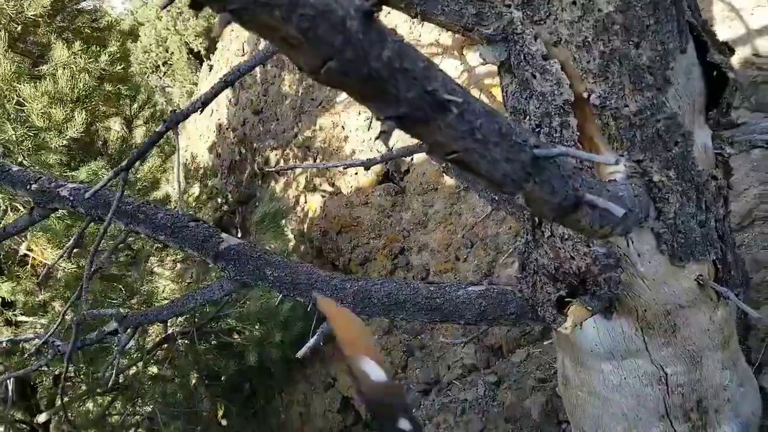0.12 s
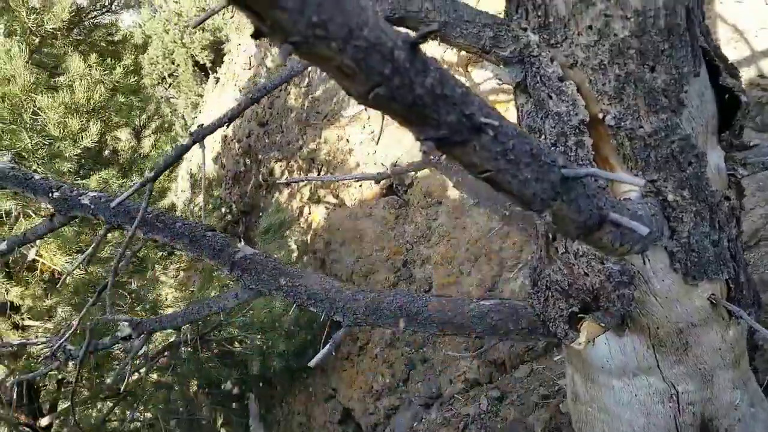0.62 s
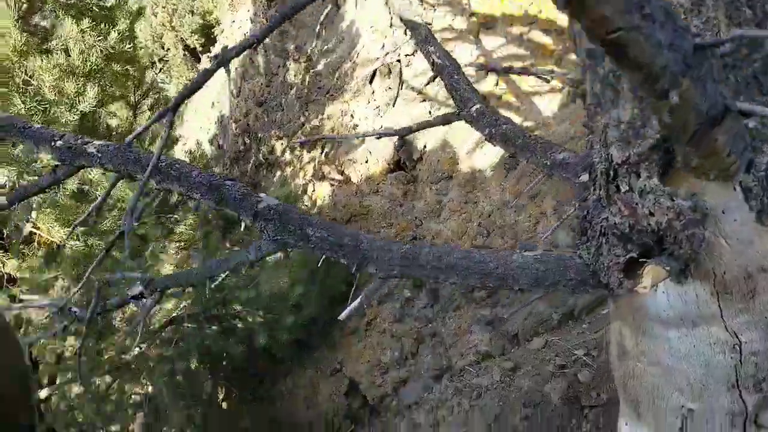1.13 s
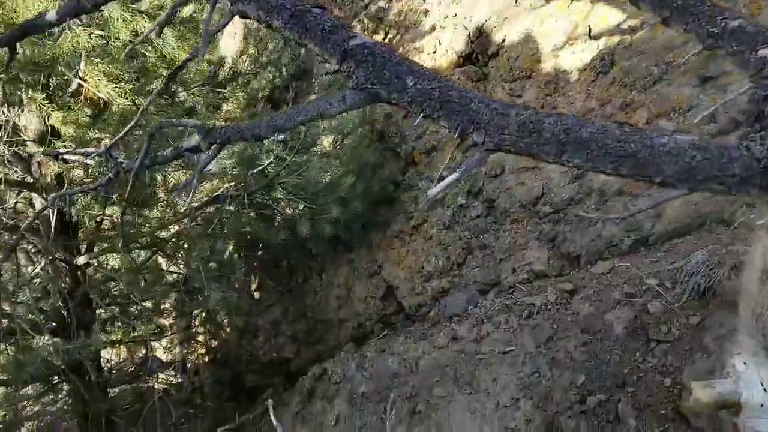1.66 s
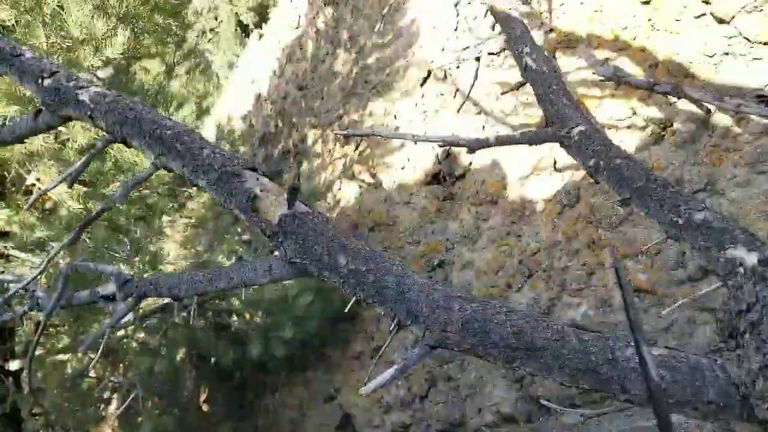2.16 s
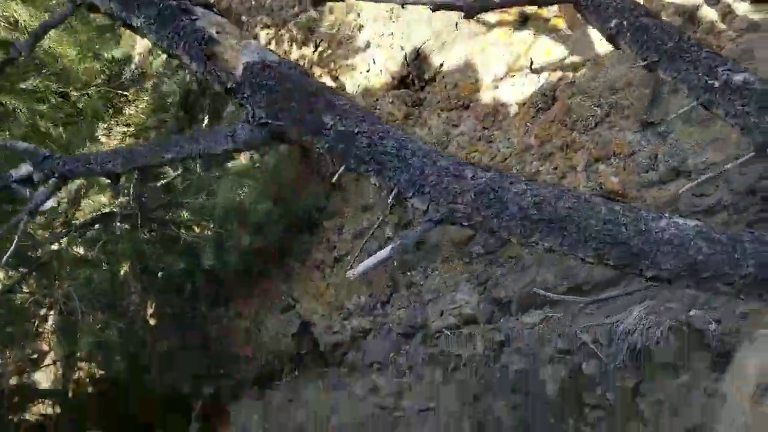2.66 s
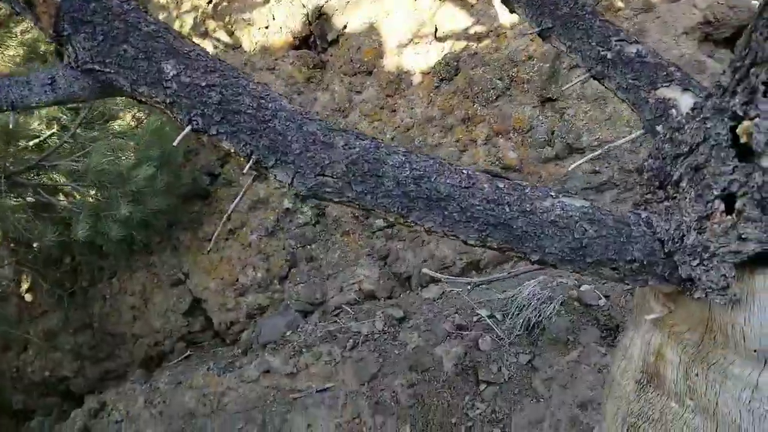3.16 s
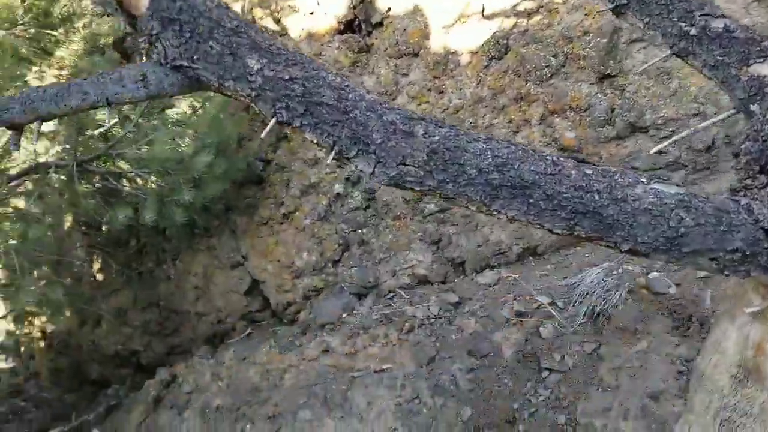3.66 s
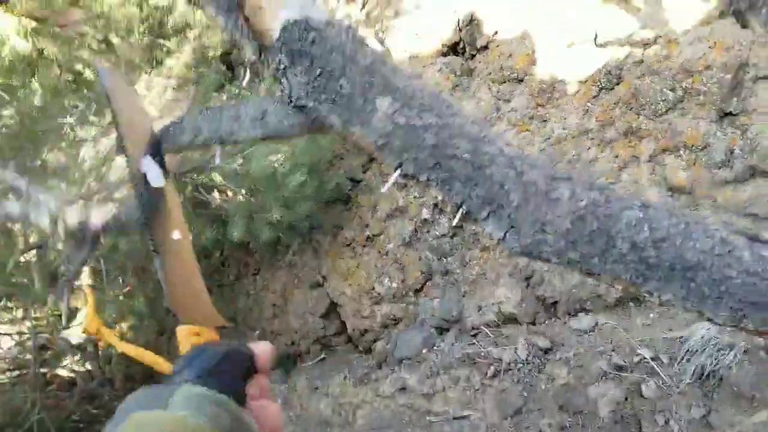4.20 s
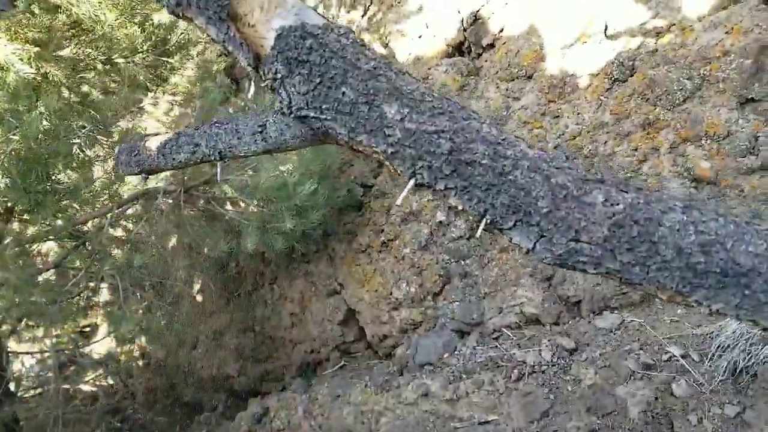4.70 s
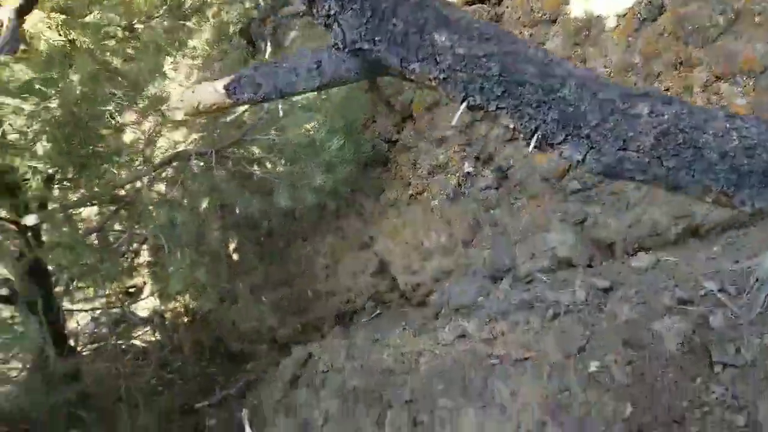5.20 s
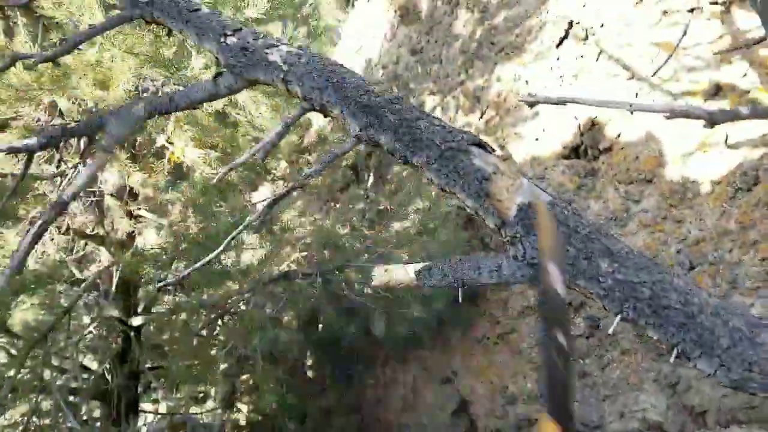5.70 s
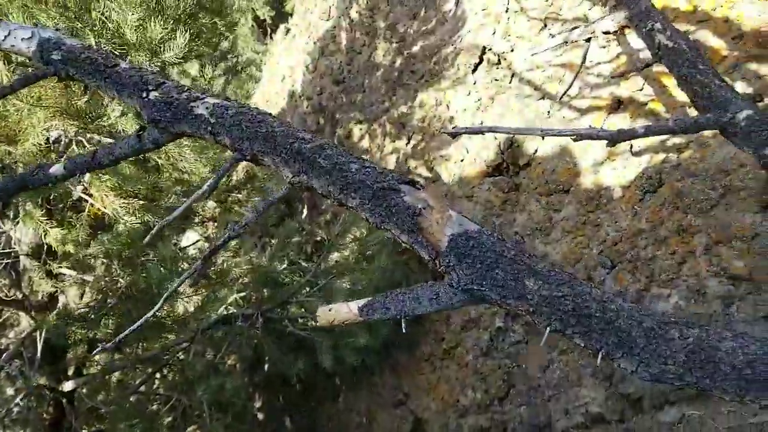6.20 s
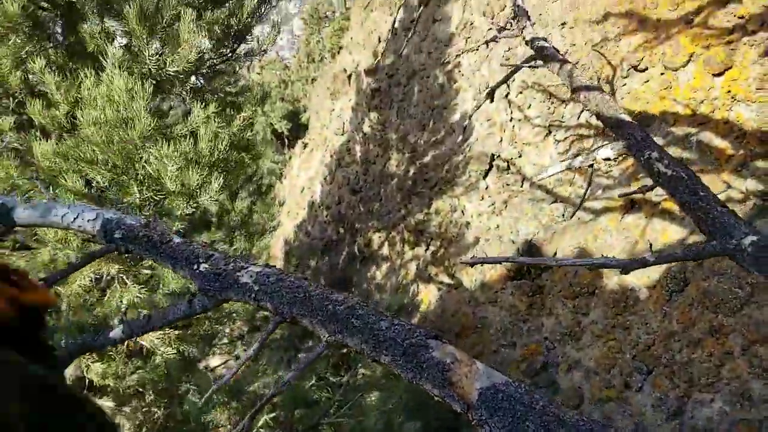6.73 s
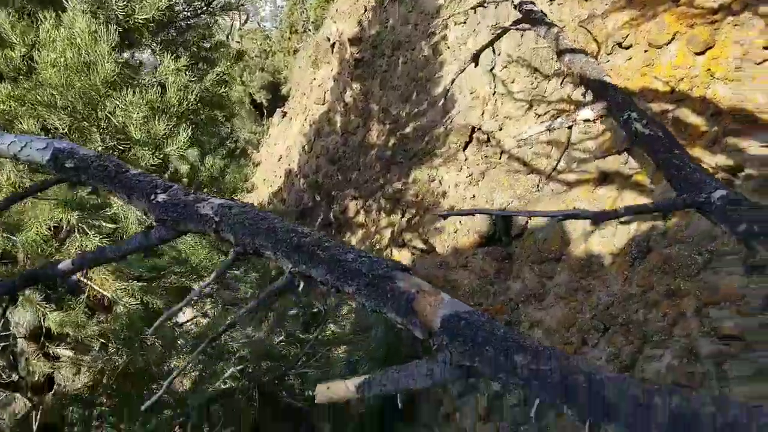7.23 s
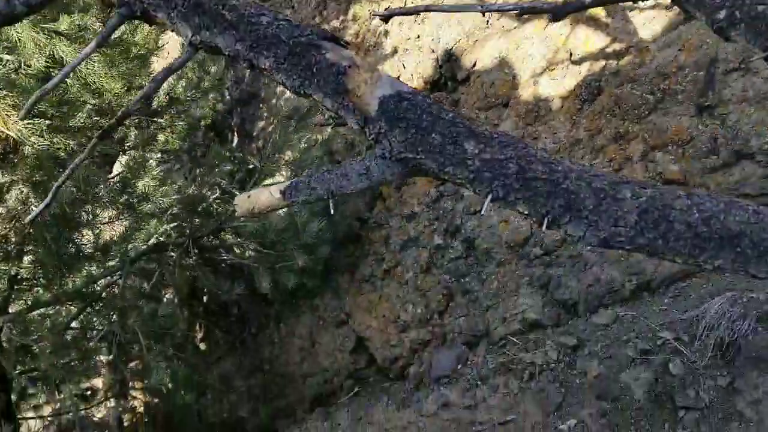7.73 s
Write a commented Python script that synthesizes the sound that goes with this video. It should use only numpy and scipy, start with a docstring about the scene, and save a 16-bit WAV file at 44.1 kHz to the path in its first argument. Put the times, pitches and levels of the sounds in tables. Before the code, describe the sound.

A heavy blade hacks dead branches close by, with sharp woody cracks, splinters ticking on stone, sleeve rustle and dull thumps through the body-worn microphone.

```python
"""Chopping dead wood on a rocky slope

A heavy blade chops dead branches close to a body-worn camera: shaped noise bursts crack and trail splinters.
Twigs tick on stone; noise with a rough plateau tears fibres. Sleeves and boots rustle as grains of noise. Jolts
and bumps thump through the camera body as low noise and decaying modes; heavy chops also ring the wood deep.
Something small clinks on the gear as a dying sine."""
import sys
import numpy as np
from scipy import signal
from scipy.fft import rfft, irfft
from scipy.io import wavfile
from scipy.ndimage import uniform_filter1d, map_coordinates

SR = 44100
rng = np.random.default_rng(int(sys.argv[2]) if len(sys.argv) > 2 else 0)


def to_linear_factor(level_db):
    """Convert decibel levels (scalar or array-like) to linear amplitude factors."""
    exponent = np.asarray(level_db, float) / 20
    return 10 ** exponent


def waveform_to_disk(signal):
    """Save audio, clipped to [-1, 1], as 16-bit WAV at the path in sys.argv[1]."""
    frames = np.transpose(np.atleast_2d(signal))
    scaled = np.clip(frames, -1, 1) * 32767
    samples = np.round(scaled).astype(np.int16)
    wavfile.write(sys.argv[1], SR, samples)


N = 346626  # samples

# Cracks of wood and stone: start_s, nominal_peak_db, pitch_hz, treble_lift_db, left_over_right_db
CRACK_EVENTS = [(0.4439, -11, 3350, 10, -8.5), (0.4629, -8, 1990, 1.5, -1), (0.4849, -9, 2270, 12, -4),
                (0.4914, -20.5, 3320, -10, 6), (0.5603, -45.5, 4600, -7, -2), (0.6647, -52, 4960, 33, 2),
                (0.734, -52, 4950, 3, -8), (0.83, -43.5, 4840, 17, -1), (0.9827, -35.5, 1840, -25, -1),
                (1.3723, -27, 2400, 2.5, -5), (1.609, -31.5, 2220, -8, -5), (1.6928, -31.5, 3000, 0, -12),
                (1.75, -24, 2410, 8, -9), (1.7856, -27.5, 3010, 10, -6.5), (1.824, -29.5, 2400, 14, -9),
                (1.8647, -33, 2050, 11.5, -3), (1.9235, -22, 650, -37.5, 7.5), (1.9735, -19, 2700, 4, -3.5),
                (2.0081, -4.5, 2850, -5.5, 3.5), (2.018, -8.5, 3090, -2, 1), (2.0271, -4, 2900, -2.5, 4.5),
                (2.0707, -16, 3600, -3, -3.5), (2.105, -19.5, 2360, 1.3, 1), (2.179, -33, 1920, 11, 6),
                (2.2839, -30, 3330, 5, -10), (2.3414, -19, 4850, -6, 0), (2.391, -31, 3830, -2, -4),
                (2.458, -38, 2240, 32, 13), (2.5212, -29, 2870, -9.5, -3.5), (2.603, -33.5, 3630, 25, -17),
                (2.6818, -24, 2300, -9, -0.5), (2.6942, -27.5, 2240, -15, 3),
                (2.7270, -35.5, 3530, -14, -2), (2.795, -4, 2620, -3.5, 1.2), (2.893, -46, 3000, -30, -16),
                (2.9333, -25.5, 2680, -1.5, 0), (2.9844, -36.5, 1280, -7, 4), (3.282, -35, 2700, -12, -3.5),
                (3.3581, -14, 4030, 3, -1), (3.3865, -11, 1620, -6, -4), (3.395, -11.5, 1900, -4, -10.5),
                (3.4158, -29.5, 1950, -24, 13), (3.4405, -43, 4500, -3, 2), (3.527, -33.5, 3060, 10, 1),
                (3.6857, -37.5, 4330, -10.5, -2), (3.829, -42.5, 2480, -27, -4.5),
                (4.0049, -40.5, 1900, -1, -12), (4.0887, 0.1, 1260, -7, 1.5), (4.2016, -13.5, 1450, 18, 11),
                (4.2229, -18.5, 7630, 11, -3), (4.3676, -39, 2500, -6, 1.5), (4.4247, -36, 3300, -8, -2),
                (4.4981, -30.5, 2600, 13, -2.5), (4.5067, -29.5, 4240, -17.5, 1.5),
                (4.5368, -20.5, 1480, -11, -1.5), (4.5439, -20.5, 4200, 2, -3),
                (4.6274, -33, 4330, 9.5, -5), (4.7411, -3, 1360, -9, -5.5), (4.753, -9.5, 1610, -20.5, 16),
                (4.8, -11, 1550, -33, -1.5), (4.8237, -20, 3050, 5, 2), (4.841, -30, 3970, -8, -3),
                (4.902, -33.5, 4500, -3.5, -2), (4.9635, -33, 3750, -5, -0.5),
                (5.1247, -36.5, 1740, -27, 5), (5.2848, -36, 2740, 1, 1), (5.6, -3.5, 1370, 6, 1.5),
                (5.6147, -3.5, 3240, -0.3, 3), (5.6946, -16, 1600, -10.5, -2.5), (5.7673, -22, 5230, 3, 1),
                (6.1029, -27, 1950, -1.5, -1.5), (6.121, -30.5, 2220, -1, 0), (6.2985, -34.5, 3950, 0, 1),
                (6.3399, -26.5, 2860, -9.5, 6), (6.389, -38, 1800, -14, 0.5),
                (6.565, -41.5, 2100, -3.5, 0.5), (6.6421, -37.5, 5600, -18, 3), (6.7435, -5, 2620, -1, 9.5),
                (6.7463, -10, 1810, -3, 3), (6.7619, -18, 1630, -32, -10.5), (6.798, -29.5, 4370, -18, 2),
                (6.8286, -38, 2260, 2, 1), (6.8627, -19, 1850, 15, -2), (6.883, -22.5, 1860, -5.5, -0.5),
                (7.0719, -19, 2130, -7.5, -0.5), (7.239, -48, 3980, 4.5, -8), (7.3978, -37, 1900, 2, -1),
                (7.508, -27.5, 2370, 2.5, -2), (7.5279, -27, 2580, -7.5, 0), (7.6217, -34, 2500, 8, 1.5),
                (7.663, -28, 4300, -6.5, -4), (7.712, -38.5, 3580, 2, -7)]
# Fibres tearing for a moment: start_s, end_s, rms_db, left_over_right_db, fade_t60_s
TEAR_EVENTS = [(0.458, 0.491, -22.5, -2, .05), (2.022, 2.048, -25.5, -0.5, 0.11),
               (2.649, 2.717, -52.5, -7.5, .06), (4.2052, 4.211, -34.5, 3.5, 0.035),
               (4.531, 4.591, -45.5, 2.5, 0.14), (4.7384, 4.767, -34, 2, 0.16),
               (6.751, 6.751, -30.5, -13, 0.046)]
# Level curves of moving limbs: time_s, cloth_db, jolt_db
MOVE_LEVELS = [(0, -63.5, -71), (0.301, -65.5, -84), (0.501, -65.5, -66), (0.749, -74, -79.5),
               (0.921, -60, -74), (1.28, -63, -63.5), (1.42, -59, -70), (1.62, -56.5, -57), (1.7, -48, -61),
               (1.779, -42.5, -55), (1.982, -41, -44), (2.151, -48.5, -60), (2.259, -53, -48.5),
               (2.45, -57.5, -62.5), (2.9, -58.5, -64), (3.079, -64.5, -75), (3.45, -63, -66.5),
               (3.95, -61.5, -76.5), (4.1, -53, -51.5), (4.28, -64.5, -67.5), (4.46, -64.5, -68),
               (4.6, -60.5, -64), (4.8, -59.5, -63.5), (5.101, -58.5, -65), (5.228, -64.5, -70),
               (5.499, -57, -70.5), (5.8, -65.5, -73), (6.05, -62, -70), (6.45, -68.5, -70),
               (6.85, -54, -56), (7.1, -65, -73), (7.55, -61.5, -66), (7.86, -60, -71)]
# Bumps through the camera body, and the deep wood ring of heavy chops: start_s, drive_db, contact_centre_hz
BUMP_EVENTS = [(0.461, -40.5, 186), (1.205, -50, 430), (1.322, -40, 102), (1.726, -42, 205),
               (1.81, -35, 172), (1.89, -43, 130), (1.922, -27, 445), (2.028, -26, 140),
               (2.031, -28.5, 283), (2.101, -34.5, 143), (2.292, -35.5, 430), (2.344, -41.5, 450),
               (2.47, -38, 410), (2.599, -51, 290), (2.794, -32, 212), (3.39, -39.5, 203),
               (3.511, -46, 445), (3.826, -48.5, 228), (4.089, -30, 780), (4.09, -26, 220),
               (4.089, -30.5, 118), (4.507, -42.5, 205), (4.741, -23, 127), (4.743, -23, 840),
               (4.8, -34, 146), (4.889, -43, 82), (5.01, -49.5, 445), (5.307, -46.5, 75),
               (5.365, -42.5, 89.7), (5.598, -35.5, 200), (5.616, -33, 200), (5.692, -45, 197),
               (5.942, -48, 430), (6.483, -43.5, 78.3), (6.744, -31, 162), (7.189, -44, 378),
               (7.388, -43, 73), (7.497, -48, 136), (7.549, -45, 97), (7.592, -46, 95)]
# Small clinks on the gear: start_s, start_level_db, pitch_hz
CLINK_EVENTS = [(2.681, -36, 2400), (5.821, -56, 800), (6.194, -60, 800), (6.518, -64, 800),
                (7.274, -61, 800)]
# Relative spectrum of a crack: frequency_hz, density_db
SNAP_SPECTRUM = [(180, -46.5), (300, -16.5), (1060, -9), (1550, -7.5), (1860, -7), (2230, -4.5), (2550, -6),
                 (2910, -5), (4710, -5), (6450, -3), (8840, -10.5), (11200, -6.5), (15800, -4.5)]
# Relative spectrum of tearing fibres: frequency_hz, density_db
FIBRE_SPECTRUM = [(290, -69), (500, -36.5), (1300, -4), (1420, -3.5), (1680, 0), (6740, -5), (8990, -17.5),
                  (12400, -4.5), (15800, -5.5)]
# Relative spectrum of rubbing cloth: frequency_hz, density_db
CLOTH_SPECTRUM = [(120, -17), (200, -7), (467, -4.5), (847, -8.5), (968, -8), (1210, -8.5), (2040, -5.5),
                  (5050, -11.5), (7000, -20.5), (9100, -37), (15400, -120)]
# Relative spectrum of grit: frequency_hz, density_db
GRIT_SPECTRUM = [(3240, -43.5), (5500, -6), (6030, -10.5), (7300, 0), (8980, -12), (13200, 2), (15200, -3),
                 (15800, 2)]
# Relative spectrum of jolts in the camera body: frequency_hz, density_db
JOLT_SPECTRUM = [(13, -47.5), (22, -5.5), (53, 2.5), (131, -0.5), (245, -7), (278, -6.5), (368, -7),
                 (450, -19), (580, -48), (990, -120)]
# Likeness of the two ports: frequency_hz, correlation (no unit)
PORT_LIKENESS = [(60, 0.7), (180, 0.93), (550, 0.76), (1650, 0.0094), (4970, 0.026), (15000, 0.011)]
# Colour difference of the ports: frequency_hz, left_over_right_db
PORT_BALANCE = [(60, 6.5), (150, 0), (380, 2.5), (950, -3.5), (2380, -9), (5980, 1), (15000, 1)]
# Modes struck by bumps: the camera body's low modes and, above 600 Hz, the deep ring of heavy wood: mode_hz,
# t60_s
STRUCK_MODES = [(78, 0.11), (105, 0.15), (138, 0.19), (200, 0.078), (290, 0.19), (445, 0.031), (620, 0.13),
                (870, 0.065)]

LOW_CUT_HZ, TOP_HZ = 42, 15900
CREST_DB = 10  # nominal peak of a crack over its first rms
# Heavy, low pieces have more body below 1 kHz (dB, dB per dB, dB per octave)
BODY_DB, BODY_PER_LEVEL, BODY_PER_OCTAVE = 2.9, 0.13, -4
MIDDLE_HZ = 2500  # pitch of an average piece
# Splinter trail under the snap; faint cracks are more trail than snap (dB, dB per dB)
TRAIL_DB, TRAIL_PER_LEVEL = -13.5, -0.078
DEBRIS_DB, DEBRIS_T60_S = -57, 0.2  # chips pattering after a blow, relative to its nominal peak
GRIT_DB, GRIT_GROWS = -5, 0.96  # grit against the mean rustle; its swing per dB of rustle
COARSER = 0.25  # stronger rubbing crackles more (dB per dB)
REACH_OCTAVES = 0.31  # how far from its centre a contact still stirs a mode
RISE_CYCLES = 0.22  # time constant of a bump's soft start, in cycles of its centre
CLINK_CYCLES = 144  # cycles to die by 60 dB


def unit(x):
    """Normalisation: scale to rms 1."""
    return x / np.sqrt(np.mean(x ** 2) + 1e-20)


def along(points, hz):
    """Logarithmic interpolation: read a (Hz, value) curve on a log frequency axis."""
    point_hz, values = np.transpose(points)
    return np.interp(np.log(hz + 1), np.log(point_hz + 1), values)


def wobble(rate):
    """Band-limited fluctuation: a smooth random curve through rate knots a second."""
    knots = rng.standard_normal(int(N * rate / SR) + 4)
    return map_coordinates(knots, [np.arange(N) * rate / SR])


def at_ports(one, other, hz):
    """Partial coherence: spectra alike in the bass, unrelated in the treble, with each port's colour."""
    turn = np.arccos(np.clip(along(PORT_LIKENESS, hz), -1, 1)) / 2
    mid, side = one * np.cos(turn), other * np.sin(turn)
    lean_db = along(PORT_BALANCE, hz) / 2
    return (mid + side) * to_linear_factor(lean_db), (mid - side) * to_linear_factor(-lean_db)


def rush(spectrum, patchy_db):
    """Spectral shaping: stereo noise of rms 1 with patches of random gain in time and frequency."""
    hz, _, z = signal.stft(rng.standard_normal((2, N)), SR, nperseg=1024)
    field = uniform_filter1d(rng.standard_normal(z.shape[1:]), size=12, axis=0)
    field = uniform_filter1d(field, size=4, axis=1)
    gain = to_linear_factor(along(spectrum, hz)[:, None] + patchy_db * unit(field))
    gain = gain * (hz < TOP_HZ)[:, None]
    pair = np.array(at_ports(z[0], z[1], hz[:, None])) * gain
    return unit(signal.istft(pair, SR, nperseg=1024)[1][:, :N])


def grains(rate, spread_db, life):
    """Shot noise: an rms-1 envelope of random contacts of uneven size, each decaying over life seconds."""
    sizes = np.minimum(rng.exponential(size=N), 3.5)  # no giants among the grains
    hits = (rng.random(N) < rate / SR) * to_linear_factor(spread_db * sizes)
    return unit(signal.lfilter([1], [1, -np.exp(-1 / (life * SR))], hits))


def causal(gain):
    """Minimum phase: fold the cepstrum of a gain curve onto positive time."""
    cepstrum = irfft(np.log(np.maximum(gain, 1e-6)))
    half = cepstrum.shape[-1] // 2
    cepstrum[..., 1:half] *= 2
    cepstrum[..., half + 1:] = 0
    return np.exp(rfft(cepstrum))


def aftermath():
    """Exponential decay: the envelope of debris jumps with every crack and dies away."""
    blows = np.zeros(N)
    for start, db, *_ in CRACK_EVENTS:
        blows[round(start * SR)] = to_linear_factor(db)
    return signal.lfilter([1], [1, -to_linear_factor(-60 / (DEBRIS_T60_S * SR))], blows)


def moves():
    """Friction as granular contact: cloth and grit rub and patter; movement jolts the camera body in lumps."""
    time_s, *curves = np.transpose(MOVE_LEVELS)
    cloth_db, jolt_db = (np.interp(np.arange(N) / SR, time_s, c) for c in curves)
    swing_db = cloth_db - cloth_db.mean()
    grit_db = cloth_db.mean() + GRIT_DB + GRIT_GROWS * swing_db
    debris = aftermath()

    # Grains common to both materials
    coarse = 0.45 * to_linear_factor(COARSER * swing_db)
    rub = to_linear_factor(0.33 * wobble(25) + 0.55 * wobble(4.8))
    rub = rub * (2.0 + coarse * grains(160, spread_db=3, life=0.0012))

    # Further grains, each set heard in one material only
    crumbs, specks = (1.5 + 0.5 * grains(210, spread_db=7.0, life=0.0013) for _ in range(2))
    cloth = unit(rub * crumbs * rush(CLOTH_SPECTRUM, patchy_db=1.5))
    cloth = cloth * (to_linear_factor(cloth_db) + to_linear_factor(DEBRIS_DB) * debris)
    grit = unit(rub * specks * rush(GRIT_SPECTRUM, patchy_db=2.0))
    grit = grit * (to_linear_factor(grit_db) + to_linear_factor(DEBRIS_DB + GRIT_DB) * debris)

    lumps = to_linear_factor(2.5 * wobble(14))
    jolts = to_linear_factor(jolt_db) * unit(lumps * rush(JOLT_SPECTRUM, patchy_db=3.0))
    return cloth + grit + jolts


def bumps():
    """Modal excitation: a contact stirs modes near its centre (camera body low, wood above 600 Hz), nearly
    alike at both ports."""
    out, t = np.zeros((2, N + SR)), np.arange(SR // 3) / SR
    mode_hz, t60 = np.transpose(STRUCK_MODES)[:, :, None, None]
    for start, db, centre_hz in BUMP_EVENTS:
        share = np.exp(-(np.log2(mode_hz / centre_hz) / REACH_OCTAVES) ** 2)
        # Random-walk phase in radians makes the ring unsteady
        shared, left, right = np.cumsum(rng.standard_normal((3, len(t))), axis=1)
        drift = 0.052 * shared + 0.018 * np.array([left, right])
        ring = share * to_linear_factor(-60 * t / t60) * np.sin(2 * np.pi * mode_hz * t + drift)
        rise = 1 - np.exp(-t * centre_hz / RISE_CYCLES)
        out[:, round(start * SR):][:, :len(t)] += to_linear_factor(db) * rise * ring.sum(axis=0)
    return out[:, :N]


def clinks():
    """Damped oscillation: one mode rings out at each touch, slightly to the right."""
    out, t = np.zeros(N + SR), np.arange(SR // 4) / SR
    for start, db, hz in CLINK_EVENTS:
        decay = to_linear_factor(db - 60 * t * hz / CLINK_CYCLES)
        out[round(start * SR):][:len(t)] += decay * np.sin(2 * np.pi * hz * t)
    return out[:N] * to_linear_factor([[-1.5], [1.5]])


def tears():
    """Dense fracture noise: splitting fibres start suddenly, hold a rough plateau and fade quickly."""
    t, envelope = np.arange(N) / SR, np.zeros((2, N))
    for start, end, db, lean, fade in TEAR_EVENTS:
        attack = np.clip((t - start) / 0.00045, 0, 1)
        shape = attack * to_linear_factor(-60 * np.maximum(t - end, 0) / fade)
        envelope += shape * to_linear_factor(db + np.array([[lean / 2], [-lean / 2]]))
    rough = 1 + 0.5 * grains(1500, spread_db=2, life=0.0008)
    return envelope * unit(rough * rush(FIBRE_SPECTRUM, patchy_db=1.5))


def cracks(snap_t60=0.0086, trail_t60=0.098, ring_db=7, ring_share=0.28):
    """Impulsive excitation of a resonance: a brief burst rings each piece; splinters trail behind."""
    size, count = 8192, len(CRACK_EVENTS)  # samples in a piece, number of pieces
    start, db, pitch_hz, treble_db, pan = np.transpose(CRACK_EVENTS)[:, :, None]
    t, hz = np.arange(size) / SR, np.fft.rfftfreq(size, 1 / SR)

    # Envelopes in time; splinters let go in fits
    snap = to_linear_factor(-60 * (t / snap_t60) ** 1.5) * (1 - np.exp(-t / 0.0003))
    trail_db = TRAIL_DB + TRAIL_PER_LEVEL * db
    trail = to_linear_factor(trail_db - 60 * t / trail_t60) * (1 - np.exp(-t / 0.0028)) * (t < 0.15)
    fits_db = 3 * np.repeat(rng.standard_normal((count, size // 128)), 128, axis=1)
    trail = trail * to_linear_factor(fits_db)

    # Resonance and colour in frequency
    ring = to_linear_factor(ring_db) / (1 + ((hz - pitch_hz) / (ring_share * pitch_hz / 2)) ** 2)
    tilt = to_linear_factor(treble_db / (1 + (5500 / (hz + 1)) ** 4))
    body_db = BODY_DB + BODY_PER_LEVEL * db + BODY_PER_OCTAVE * np.log2(pitch_hz / MIDDLE_HZ)
    body = to_linear_factor(body_db / (1 + (hz / 1000) ** 4))
    colour = causal(to_linear_factor(along(SNAP_SPECTRUM, hz)) * tilt * body)

    noise = rng.standard_normal((count, 2, size))
    burst = rfft(noise * snap) * causal(1 + ring)[:, None]
    splinters = rfft(noise * trail[:, None]) * (1 + 0.4 * ring[:, None])
    spectrum = (burst + splinters) * colour[:, None]
    pieces = irfft(np.stack(at_ports(spectrum[:, 0], spectrum[:, 1], hz), axis=1))

    # Level set by the rms of the first 1/300 s
    first_rms = np.sqrt(np.mean(pieces[..., :SR // 300] ** 2, axis=(1, 2)))
    pieces = pieces / first_rms[:, None, None]
    out = np.zeros((2, N + size))
    for at, piece, level, lean in zip(start[:, 0], pieces, db[:, 0], pan[:, 0]):
        gain = to_linear_factor(level - CREST_DB + lean / 2 * np.array([[1], [-1]]))
        out[:, round(at * SR):][:, :size] += piece * gain
    return out[:, :N]


def scene():
    """Superposition: all sources add at the two ports."""
    return moves() + bumps() + clinks() + tears() + cracks()


def roll_off(x):
    """The treble ends steeply here."""
    return signal.sosfilt(signal.butter(12, 17160, fs=SR, output="sos"), x)


def record(dry):
    """Band limiting and saturation: the camera drops deepest bass and highest treble and clips at full scale."""
    low_cut = signal.butter(2, LOW_CUT_HZ, "high", fs=SR, output="sos")
    top_cut = signal.cheby2(16, 30, TOP_HZ + 400, fs=SR, output="sos")
    banded = signal.sosfilt(np.vstack([low_cut, top_cut]), dry)
    mix = np.clip(banded, -1, 1)
    return roll_off(mix)


dry = scene()
out = record(dry)
waveform_to_disk(out)
```